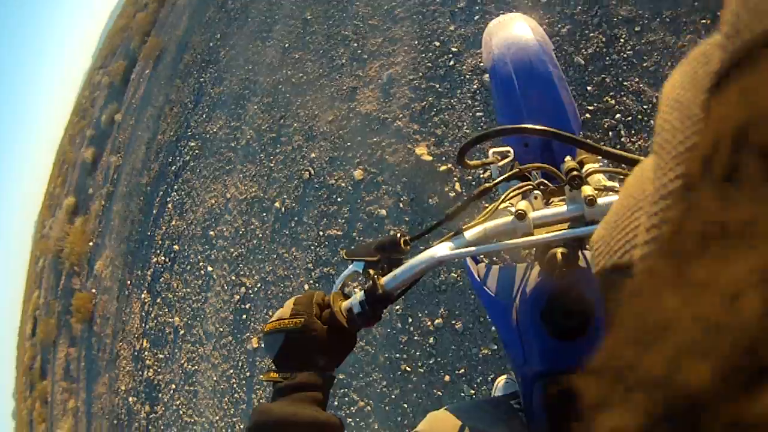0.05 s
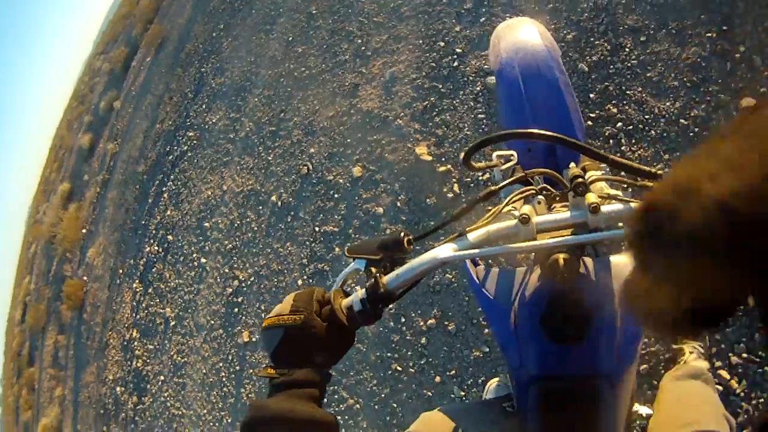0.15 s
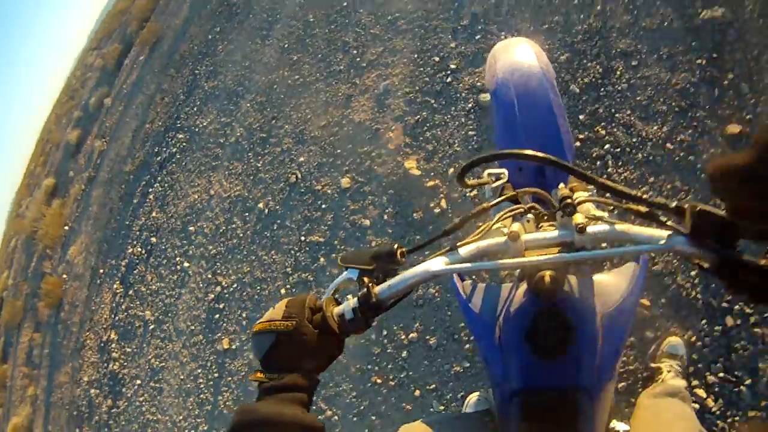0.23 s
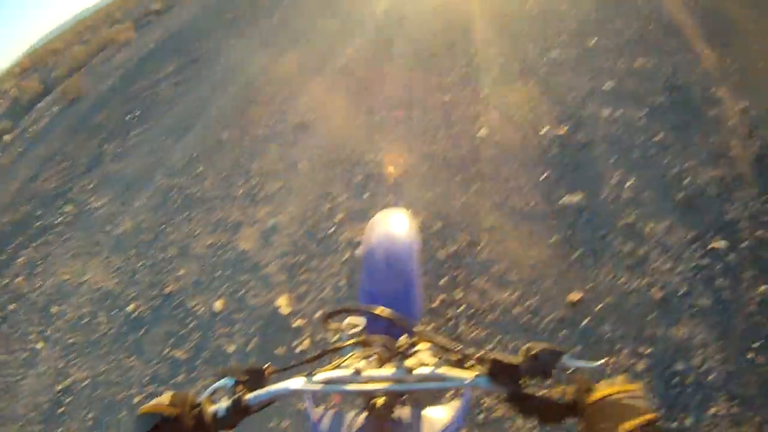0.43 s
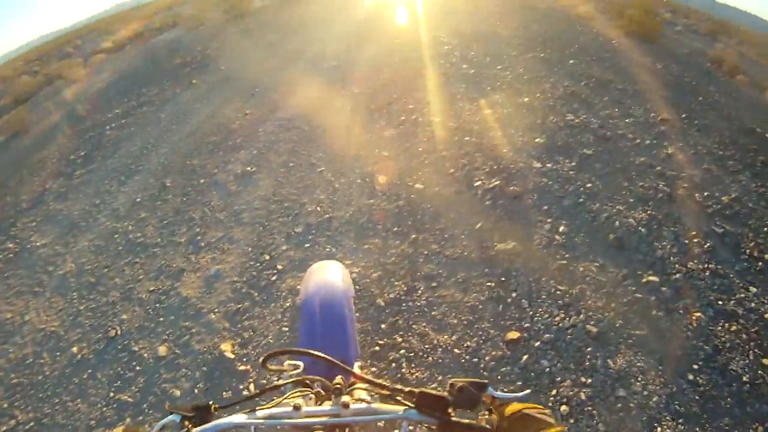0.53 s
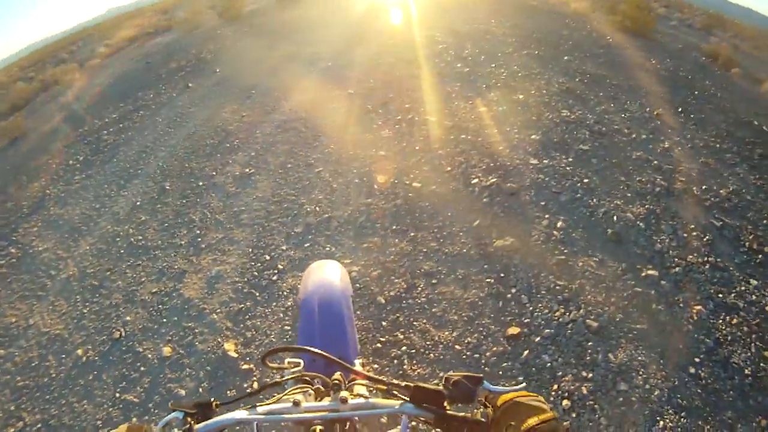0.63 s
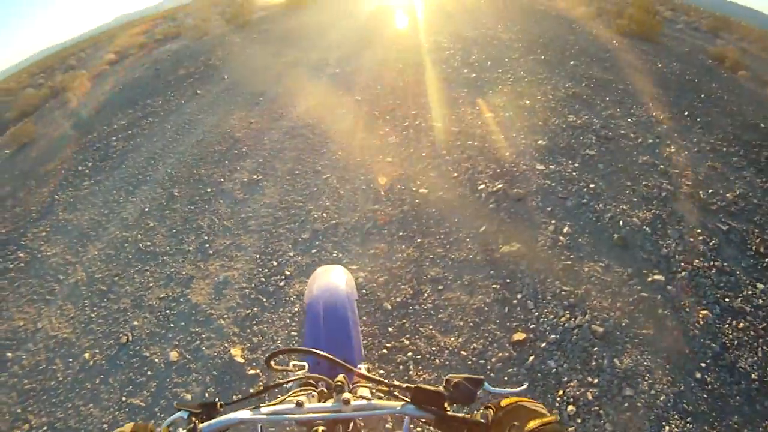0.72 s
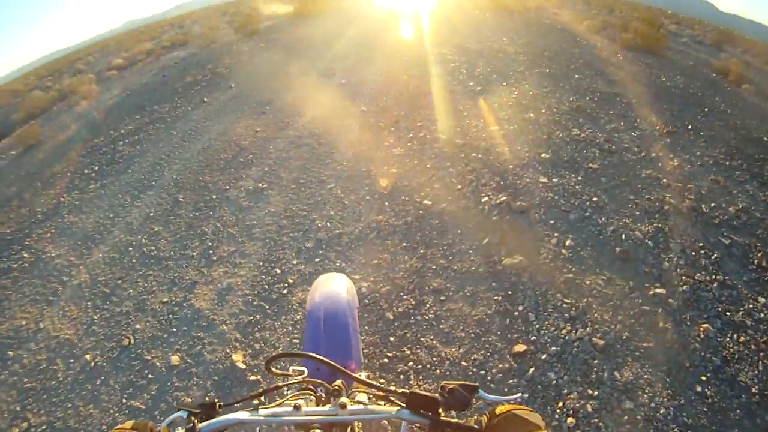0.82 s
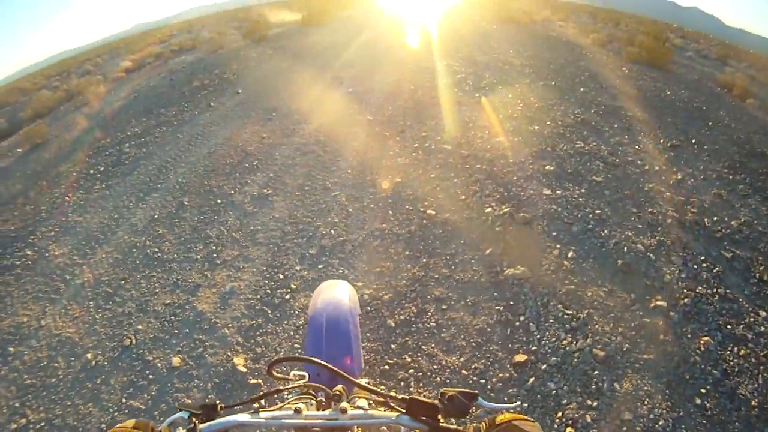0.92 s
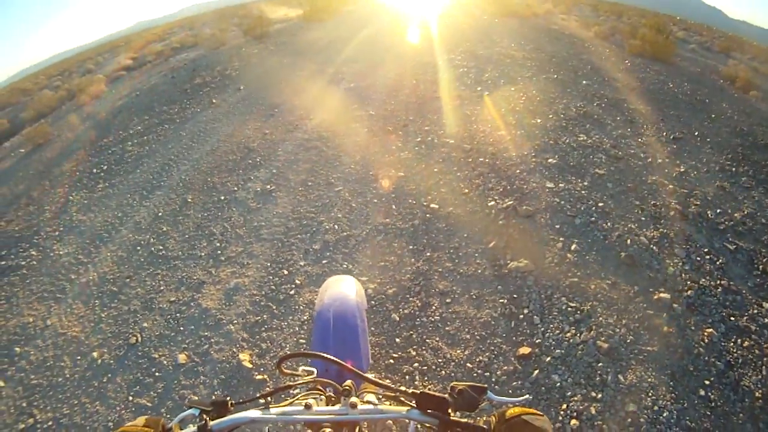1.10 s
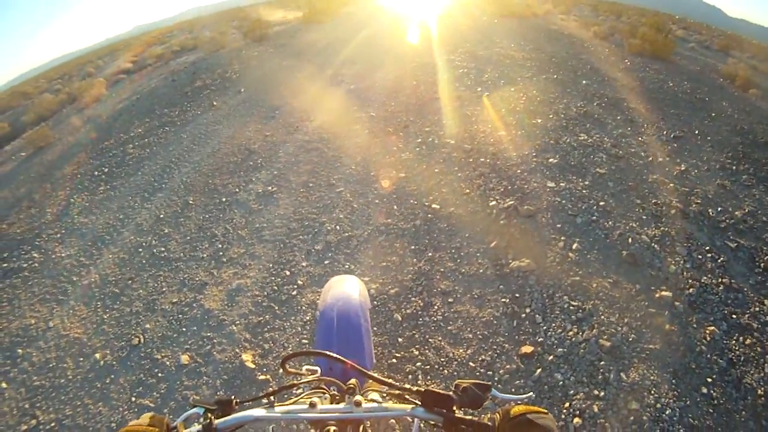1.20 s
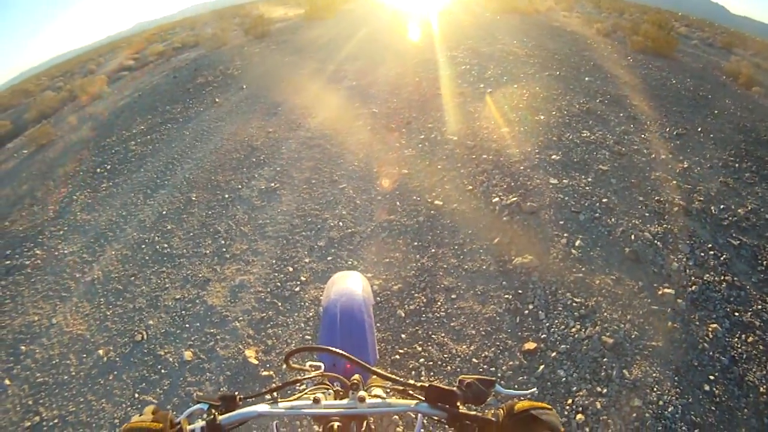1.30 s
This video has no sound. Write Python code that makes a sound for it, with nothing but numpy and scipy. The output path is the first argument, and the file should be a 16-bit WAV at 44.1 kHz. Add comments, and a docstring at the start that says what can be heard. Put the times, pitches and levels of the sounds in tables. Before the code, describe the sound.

A helmet camera's plastic case clicks, takes one hard knock, then rubs and squeaks briefly, very close and gritty. Soft wind rumble and a dirt bike's tyres on gravel remain, broken once by a sharp electrical pop.

```python
"""The plastic case of a helmet camera clicks, takes one hard knock, is rubbed and squeaks.
Each hit makes the plastic ring briefly; the camera's mount snaps back and wobbles.
Underneath, a dirt bike rolls slowly over gravel, with soft tyre crunch, wind and a faint hum.
The recorder makes it all coarse and gritty, and drops out once with an electrical pop."""
import sys
import numpy as np
from scipy import signal
from scipy.fft import rfft, irfft
from scipy.io import wavfile
from scipy.ndimage import uniform_filter1d

SR = 44100
rng = np.random.default_rng(int(sys.argv[2]) if len(sys.argv) > 2 else 0)


def wav_out(sig):
    """Save sig, one row per channel (or a flat mono array), as 16-bit PCM at SR to the path in sys.argv[1]."""
    wavfile.write(sys.argv[1], SR, np.round(np.clip(np.atleast_2d(sig).T, -1, 1) * 32767).astype(np.int16))


N = 59535
T = np.arange(N) / SR

# wind and frame rumble (time [s], level [dB])
RUMBLE_LEVELS = [(.068, -44), (.11, -39.5), (.17, -36), (.25, -33.5), (.32, -50), (.41, -42.5),
                 (.48, -51.5), (.6, -49.5), (.7, -49), (.79, -48.5), (.88, -51.5), (1.03, -54), (1.17, -53),
                 (1.29, -56.5), (1.35, -48.5)]
# its tone colour (frequency [Hz], relative level [dB])
RUMBLE_COLOUR = [(15, -1.5), (45, -3), (82, 4), (125, -3), (190, -13), (262, -12), (340, -21.5), (600, -31),
                 (1500, -65.5)]
# faint hum (time [s], level [dB])
HUM_LEVELS = [(.3, -70), (.45, -56), (.56, -57), (.7, -69.5), (1.35, -68)]
# tyres on gravel (time [s], level [dB])
GRAVEL_LEVELS = [(.068, -63), (.3, -47.5), (.36, -52), (.45, -54), (.6, -55), (.75, -57), (.88, -62),
                 (1.0, -64), (1.15, -61), (1.26, -60.5), (1.31, -61), (1.35, -51)]
# their tone colour (frequency [Hz], relative level [dB])
GRAVEL_COLOUR = [(200, -4), (450, -3.5), (700, -3), (1000, -0.5), (1200, 6.5), (1550, -1), (2050, 3),
                 (2900, -10), (3500, -6), (4400, -16), (5600, -13)]
# single stones (time [s], level [dB], pitch [Hz])
STONE_TICKS = [(.5415, -44, 5310), (0.543, -37, 2116), (.708, -50, 5300), (.712, -44, 1800),
               (.817, -44, 1670), (0.847, -48.5, 2424), (0.919, -44, 1400), (1.238, -47.5, 1753),
               (1.257, -52.5, 2500)]
# bumps that sway the mount (time [s], length [s], level [dB], frequency [Hz])
BUMPS = [(.193, .042, -24, 89), (.33, .06, -37, 86), (.383, .06, -35, 96.2), (0.703, 0.13, -46, 80.5),
         (.772, 0.021, -38, 70.5), (1.15, 0.0342, -47, 85.5)]
# the mount snaps back (time [s], snap level [dB], sway level [dB])
SNAPS = [(0.2503, -16, -18.5), (.2975, -39, -37)]
# ringing tones of the mount (frequency [Hz], level [dB], time to fade by 60 dB [s])
MOUNT_TONES = [(302, -13, 0.029), (890, -6, .012), (1170, -12.5, 0.018), (1900, -1.5, 0.014),
               (3400, -6.5, 0.017), (3522, -10.5, .012)]
# rubbing on the case (time [s], level [dB])
RUB_LEVELS = [(.068, -59), (.1, -45.5), (.112, -39), (.125, -39), (.15, -37), (.176, -36), (.19, -24.5),
              (.203, -29), (.219, -33.5), (.227, -33.5), (.234, -54.5), (.248, -53), (.256, -41.5),
              (.283, -45.5), (.294, -33.5), (.306, -52), (.34, -58.5)]
# its tone colour (frequency [Hz], relative level [dB])
RUB_COLOUR = [(150, -17.5), (550, -7.5), (900, -6.5), (1070, 2), (1350, -7.5), (1850, -2), (2300, -3),
              (2750, -8.5), (3350, -6), (4300, -17.5), (5600, -14.5)]
# squeak of the case (time [s], pitch [Hz], level [dB])
SQUEAK_PATH = [(0.255, 1950, -55), (.261, 2040, -37), (0.271, 1969, -39), (.278, 2082, -29),
               (.284, 2256, -44), (0.289, 1896, -37.5), (.295, 1906, -36), (0.302, 2178, -38.5),
               (0.309, 2203, -60)]
# clicks of the case (time [s], gain [dB], relative chatter level [dB], treble limit [Hz])
CLICKS = [(.1082, -5.5, -12, 4600), (0.1188, -16.5, -6, 5000), (.1302, -28, -8.5, 4000),
          (.1341, -13, -17, 2600), (.1358, -24.5, -12, 2800), (0.1636, -25.5, -6, 3000),
          (.1890, -20.5, -15, 4000), (0.1971, -21.5, -13, 4000), (0.1995, -20, -7, 4000),
          (0.2136, -26.5, -22, 4000), (.2230, -16, -13, 3800), (0.2244, -28, -6, 3800)]
# ringing tones of a click (frequency [Hz], level [dB], time to fade by 60 dB [s])
CASE_TONES = [(1170, -16, 0.004), (1685, -11.5, 0.0077), (2265, -3, 0.008), (2950, -8, 0.0042),
              (3460, -13.5, 0.016), (4700, -18.5, .005)]
# ringing tones of the whole shell (frequency [Hz], level [dB], time to fade by 60 dB [s])
SHELL_TONES = [(281, -16.5, 0.016), (910, -12.5, 0.0087), (1068.8, 1, 0.0094), (1580, -9.5, 0.011),
               (2904, -16.5, 0.01)]
# the sound cuts out and returns (time [s], gain [dB])
DROPOUT = [(1.047, 0), (1.050, -50), (1.066, -36), (1.08, -16), (1.11, -13), (1.128, -9), (1.136, 0)]
# electrical pops (time [s], height [dB], decay time [s], delay of the left channel [s])
POPS = [(1.0472, -32, .0008, 0), (1.06068, -4, .003, .00091)]

HUM_HZ, HUM_WAVER = 263, 0.027
STONE_FADE_S = 0.0092
SNAP_RISE_S, SWAY_HZ, SWAY_FADE_S = .0003, 92, 0.068
SQUEAK_JITTER, SQUEAK_FLUTTER_DB = .07, 2
CHATTER_S, CLICK_LOW_CUT_HZ = .0022, 1000
KNOCK_S, KNOCK_RISE_S, KNOCK_DB = .1577, 0.001, 15
PUSH_DB, PUSH_S, CRACK_DB, CRACK_S = 2.5, 0.0022, 16.5, .0011
COARSE_HZ, TREBLE_LIMIT_HZ, FULL_SCALE = 12000, 15700, .94
START_S, FADE_IN_S = 0.067, 0.0041


def amp(db):
    """Turns decibels into a gain."""
    return 10 ** (np.asarray(db) / 20)


def unit(x):
    """Scales x to an average strength (rms) of 1."""
    return x / np.sqrt(np.mean(x ** 2) + 1e-20)


def level(points):
    """Gain over time from (time [s], level [dB]) points."""
    return amp(np.interp(T, *np.transpose(points)))


def colour(x, points):
    """Shapes the bass, mids and treble of x, at strength 1."""
    hz, db = np.transpose(points)
    log_hz = np.log(np.fft.rfftfreq(N, 1 / SR) + 1)
    gain = amp(np.interp(log_hz, np.log(hz), db))
    return unit(irfft(rfft(x) * gain, N))


def since(s):
    """Time since s, zero before."""
    return np.maximum(T - s, 0)


def wander(size):
    """Random drift of strength 1, smoothed over size samples."""
    return unit(uniform_filter1d(rng.standard_normal(N), size=size))


def ring(tones, s):
    """An object struck at time s rings with tones that die away."""
    t = since(s)
    alive = (t > 0) & (t < 2 * max(fade for _, _, fade in tones))
    out = np.zeros(N)
    for hz, db, fade in tones:
        out[alive] += amp(db - 60 * t[alive] / fade) * np.sin(2 * np.pi * hz * t[alive])
    return out


def grains(per_s, spread_db):
    """Tiny random hits of uneven size."""
    hits = (rng.random(N) < per_s / SR) * rng.choice([-1, 1], N)
    return hits * amp(spread_db * np.minimum(rng.exponential(1, N), 4))


def chatter(s, decay_s):
    """A brief burst of tiny contacts, with energy 1."""
    burst = rng.standard_normal(N) * (T > s) * np.exp(-since(s) / decay_s)
    return burst / np.linalg.norm(burst)


def rumble():
    """Wind and the bike's frame make a low noise."""
    return level(RUMBLE_LEVELS) * colour(rng.standard_normal(N), RUMBLE_COLOUR)


def hum():
    """A faint tone wavers in pitch."""
    pitch = HUM_HZ * (1 + HUM_WAVER * wander(size=1500))
    return level(HUM_LEVELS) * np.sin(2 * np.pi * np.cumsum(pitch) / SR)


def gravel():
    """The tyres crunch gravel in clumps, and single stones tick."""
    crunch = grains(per_s=5700, spread_db=1.5) * amp(1.6 * wander(size=700))
    stones = sum(ring([(hz, db, STONE_FADE_S)], s) for s, db, hz in STONE_TICKS)
    return level(GRAVEL_LEVELS) * colour(crunch, GRAVEL_COLOUR) + stones


def mount():
    """The mount snaps back, sways with a low tone, and sways again over bumps."""
    out = np.zeros(N)
    for s, snap_db, sway_db in SNAPS:
        snap = amp(snap_db) * np.minimum(since(s) / SNAP_RISE_S, 1) * ring(MOUNT_TONES, s)
        out += snap + ring([(SWAY_HZ, sway_db, SWAY_FADE_S)], s)
    for s, length, db, hz in BUMPS:
        swell = abs(np.sin(np.pi * np.minimum(since(s) / length, 1))) ** .5
        out += amp(db) * swell * np.sin(2 * np.pi * hz * since(s))
    return out


def rubbing():
    """Friction on the case makes a grainy scrape."""
    return level(RUB_LEVELS) * colour(grains(per_s=5400, spread_db=3), RUB_COLOUR)


def squeak():
    """The rubbed plastic sticks and slips, making a rough tone."""
    s, hz, db = np.transpose(SQUEAK_PATH)
    pitch = np.interp(T, s, hz) * (1 + SQUEAK_JITTER * wander(size=30))
    loudness = np.interp(T, s, amp(db), left=0, right=0)
    flutter = amp(SQUEAK_FLUTTER_DB * wander(size=90))
    return loudness * flutter * np.sin(2 * np.pi * np.cumsum(pitch) / SR)


def clicks():
    """Each click rings the case, then chatters on it."""
    out = np.zeros(N)
    case_ring = ring(CASE_TONES, 0)[:2000]
    for s, db, chatter_db, treble_hz in CLICKS:
        rattle = signal.fftconvolve(chatter(s, CHATTER_S), case_ring)[:N]
        click = ring(CASE_TONES, s) + amp(chatter_db) * rattle
        # the small case gives little bass; soft contacts are duller
        band = signal.butter(2, [CLICK_LOW_CUT_HZ, treble_hz], "band", fs=SR)
        out += amp(db) * signal.lfilter(*band, click)
    return out


def knock():
    """A blunt blow pushes the whole shell and rings it, with a short crack."""
    rise = 1 - np.exp(-(since(KNOCK_S) / KNOCK_RISE_S) ** 2)
    shell = rise * ring(SHELL_TONES, KNOCK_S)
    push_age = since(KNOCK_S + KNOCK_RISE_S) / PUSH_S
    push = (push_age > 0) * (push_age - 1) * np.exp(-push_age)
    crack = chatter(KNOCK_S + KNOCK_RISE_S, CRACK_S)
    return amp(KNOCK_DB) * shell + amp(PUSH_DB) * push + amp(CRACK_DB) * crack


def scene():
    """Everything reaches one microphone."""
    mono = clicks() + knock() + mount() + squeak() + rubbing() + gravel() + rumble() + hum()
    return np.array([mono, mono])


def pop(s, db, decay_s):
    """The recorder's voltage jumps, then leaks away."""
    return amp(db) * (T >= s) * np.exp(-since(s) / decay_s)


def record(dry):
    """The recorder samples coarsely, overloads, and drops out once with a pop."""
    coarse = signal.resample(dry * level(DROPOUT), round(N * COARSE_HZ / SR), axis=1)
    coarse = signal.oaconvolve(coarse, signal.firwin(41, cutoff=5680, fs=COARSE_HZ)[None], "same")
    overloaded = np.clip(coarse, -FULL_SCALE, FULL_SCALE)
    steps = np.repeat(overloaded, 4, axis=1)  # holding each value mirrors the mids into gritty treble
    gritty = signal.resample(steps, N, axis=1) * np.minimum(since(START_S) / FADE_IN_S, 1)
    pops = sum(np.array([pop(s + lag, db, decay), pop(s, db, decay)]) for s, db, decay, lag in POPS)
    treble_cut = signal.firwin(201, TREBLE_LIMIT_HZ, window=("kaiser", 7), fs=SR)
    return signal.oaconvolve(gritty + pops, treble_cut[None], "same")


dry = scene()
out = record(dry)
wav_out(out)
```